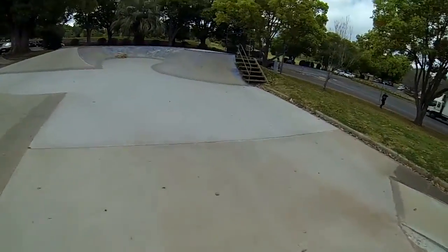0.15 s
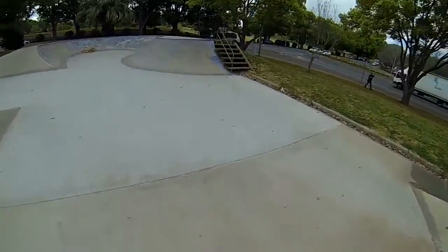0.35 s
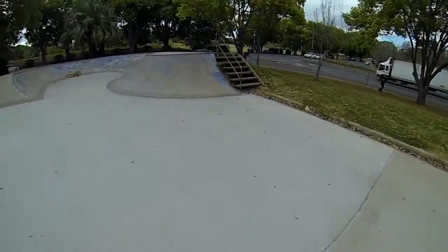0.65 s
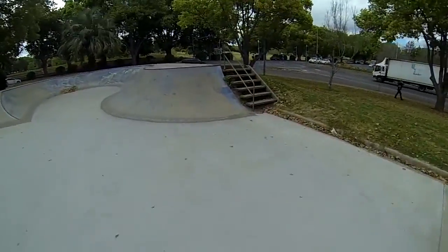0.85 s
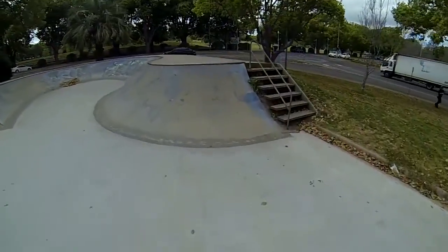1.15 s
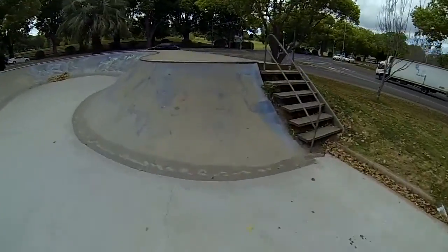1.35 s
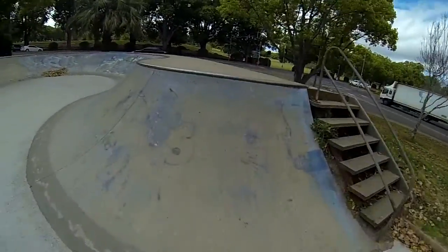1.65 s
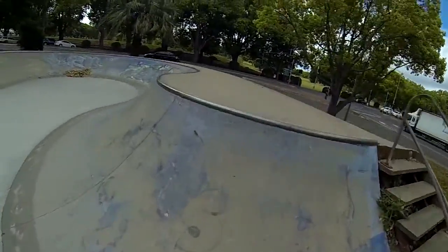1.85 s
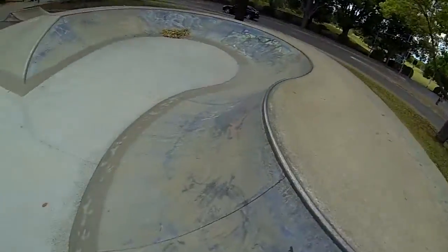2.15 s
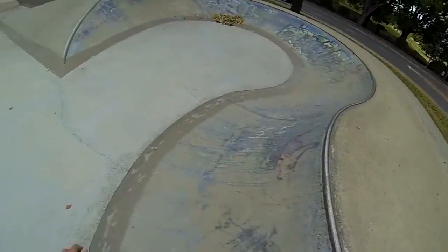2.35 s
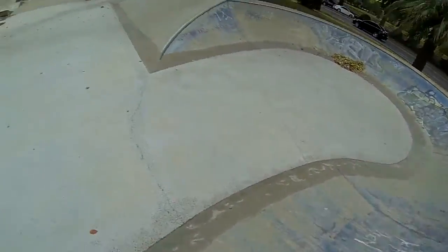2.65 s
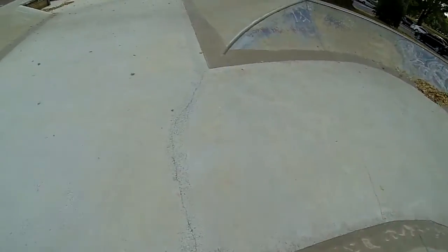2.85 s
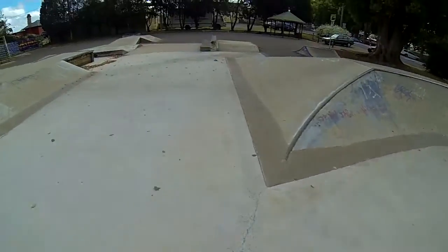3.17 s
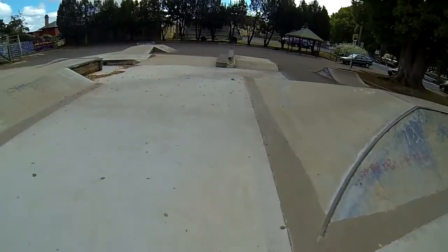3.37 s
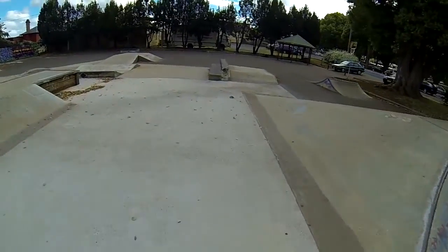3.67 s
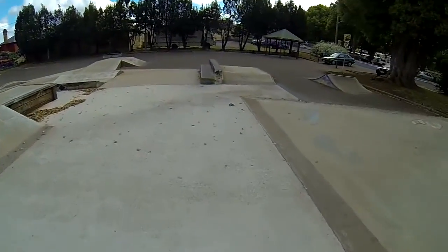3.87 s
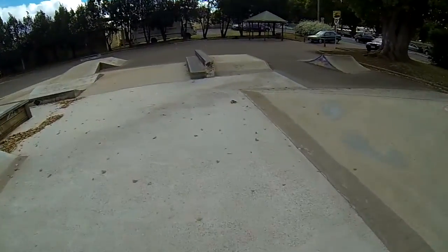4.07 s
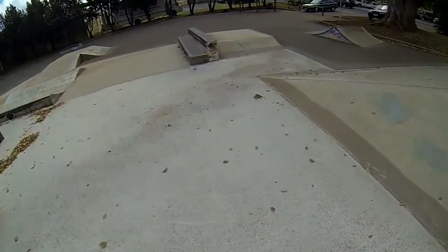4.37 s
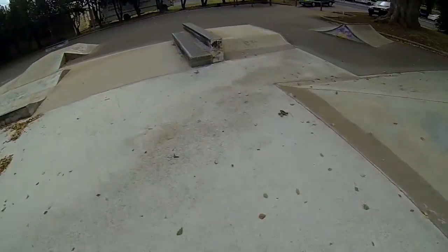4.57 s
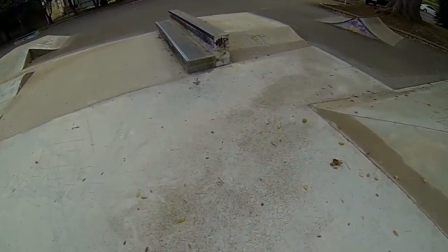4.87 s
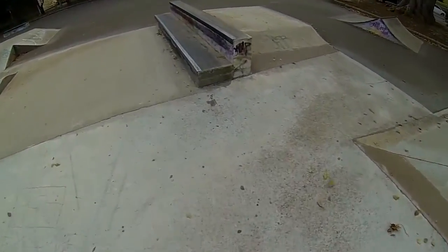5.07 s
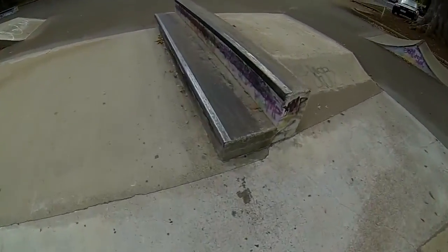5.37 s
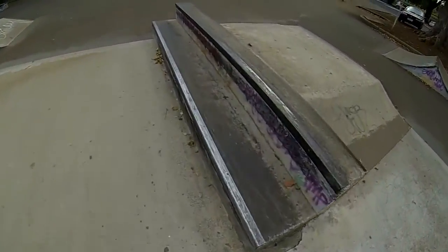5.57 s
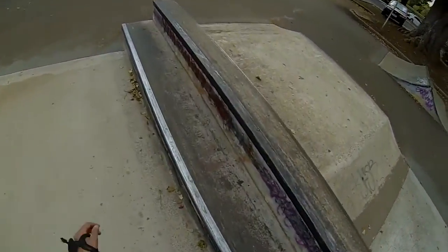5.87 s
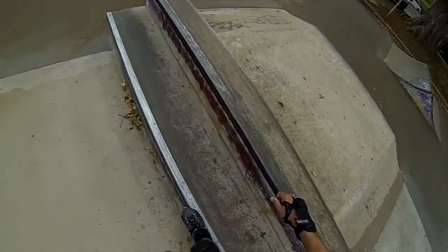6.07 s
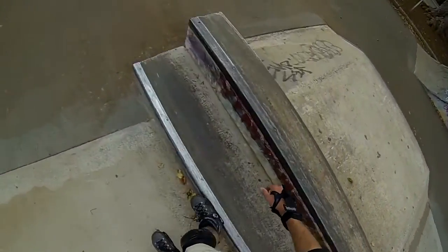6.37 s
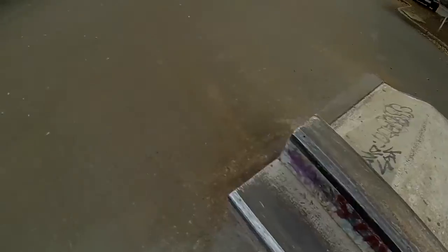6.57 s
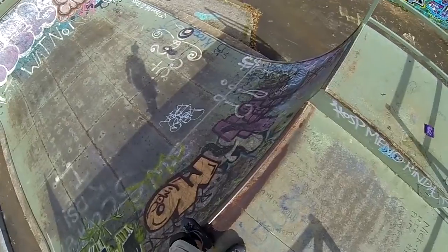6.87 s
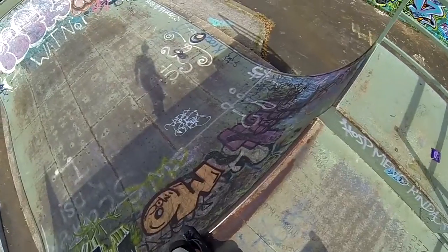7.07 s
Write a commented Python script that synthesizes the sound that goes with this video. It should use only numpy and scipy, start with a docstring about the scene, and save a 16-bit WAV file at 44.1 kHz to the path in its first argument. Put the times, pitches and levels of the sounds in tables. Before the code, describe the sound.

Close, slightly dull microphone on a moving skater in the open air. Strong low wind buffeting and popping leads, then eases so the wheels' grainy hiss and rumble show through. Loose plastic ticks cluster around a midway knock. Later come a burst of hard clatter, a short rough slide with squeaks, and a solid landing, before the sound switches suddenly to strong wind over faint rolling.

```python
"""Outdoors on concrete, a skater rolls along wearing a small camera: two shots joined by a cut.
Headwind buffets the microphone port: slow and quick noise in gusts and lulls, with single steep swings.
Wheels hiss and rumble as shaped noise, more quietly in the second shot.
Noisy shoves ring frames and boots; a slide along a ledge is slipping noise with rasps and squeaks.
Low swings thud, the loose camera mount ticks and rattles, and a thin whistle swells twice."""
import sys
import numpy as np
from scipy import signal
from scipy.fft import rfft, irfft, next_fast_len
from scipy.io import wavfile
from scipy.ndimage import uniform_filter1d, minimum_filter1d

SR = 44100
rng = np.random.default_rng(int(sys.argv[2]) if len(sys.argv) > 2 else 0)


def convert_level_to_amplitude(level_db):
    """Map a level in decibels to its linear amplitude factor."""
    exponent = np.asarray(level_db, float) / 20
    return 10 ** exponent


def inscribe(sig):
    """Save sig as 16-bit PCM at rate SR to the path in sys.argv[1].

    A 1-D sig is mono; a 2-D sig holds one channel per row.
    Samples are clipped to [-1, 1] before scaling.
    """
    pcm = np.round(np.clip(np.atleast_2d(sig).T, -1, 1) * 32767)
    wavfile.write(sys.argv[1], SR, pcm.astype(np.int16))


N = 318843  # length in samples


def noise():
    """White noise: every pitch equally strong."""
    return rng.standard_normal(N)


def unit(x):
    """Scale a sound to an rms of 1, so that a level can be set afterwards."""
    return x / np.sqrt(np.mean(x ** 2))


def colour(x, spectrum):
    """Shape the spectrum of x by (pitch_hz, level_db) points; rms 1."""
    hz, db = np.transpose(spectrum)
    size = next_fast_len(N)
    log_hz = np.log(np.fft.rfftfreq(size, 1 / SR) + 1)
    shape_db = np.interp(log_hz, np.log(hz), db)
    return unit(irfft(rfft(x, size) * convert_level_to_amplitude(shape_db), size)[:N])


def narrow(hz, width_hz):
    """Noise gathered around one resonance; rms 1."""
    return colour(noise(), [(hz + k * width_hz, -12 * k * k) for k in range(-3, 4)])


def curves(table):
    """Join timed points with straight lines, one curve per column; -120 dB outside the table."""
    s, *columns = np.transpose(table)
    return [np.interp(np.arange(N) / SR, s, column, left=-120, right=-120) for column in columns]


def walk(rate):
    """Random levels, drawn `rate` times per second and smoothed twice; rms 1."""
    k = int(SR / rate)
    steps = np.repeat(rng.standard_normal(N // k + 1), k)
    return unit(uniform_filter1d(uniform_filter1d(steps, k), k)[:N])


def wander(rate):
    """A walk less its own quarter-second average, so that it keeps coming back."""
    steps = walk(rate)
    return steps - uniform_filter1d(steps, int(.25 * SR))


def even(x, seconds):
    """Divide out the slow swings in the size of x; rms 1."""
    size = uniform_filter1d(np.abs(signal.hilbert(x, next_fast_len(N))[:N]), int(seconds * SR))
    return unit(x / size)


def peak(s, db, rise_db_s, fall_db_s):
    """A level in dB that climbs to one moment and falls away from it."""
    late = np.arange(N) / SR - s
    return db - np.where(late < 0, -rise_db_s, fall_db_s) * late


def ring(force, modes, tilt_db, contact_ms):
    """A force rings damped modes; tilt_db(hz) and chance weight them for the spot struck; peak 1."""
    t_ms = np.arange(len(force)) / SR * 1000
    hz, db, t60_ms = np.transpose(modes)[:, :, None]
    # no two strikes ring quite alike
    hz = hz * (1 + .04 * rng.standard_normal(hz.shape))
    db = db + tilt_db(hz) + 2 * rng.standard_normal(hz.shape)
    decay = 1000. ** (-t_ms / t60_ms)  # 60 dB down after t60_ms
    body = np.sum(convert_level_to_amplitude(db) * np.sin(2 * np.pi * hz * t_ms / 1000) * decay, axis=0)
    body *= (1 - np.exp(-t_ms / contact_ms)) ** 2  # the contact gives a little, which blunts the edge
    sound = signal.fftconvolve(force, body)[:len(force)]
    return sound / np.abs(sound).max()


def add(out, s, sound):
    """Mix a short sound into out from s seconds on."""
    i = int(s * SR)
    out[i:i + len(sound)] += sound[:N - i]


def wind():
    """Large eddies heave slowly, small ones flutter in bursts, a few burst on the port as steep swings."""
    # headwind before and after the cut: (start_s, buffet_db, flutter_over_buffet_db)
    headwind = [
        [(0.0, -28.5, 3), (0.12, -15, -1), (0.5, -17, 2.5), (0.7, -23, 2), (1.0, -16.5, 1), (1.4, -17.5, 0),
         (1.65, -20, 1.5), (1.85, -15.5, 0), (2.08, -24.5, -8), (2.45, -23, -6), (2.75, -26, -11.5),
         (3.2, -22, -13), (3.6, -25.5, -13.5), (4.0, -26.5, -11.5), (4.75, -25, -6), (5.25, -23, -4),
         (5.65, -25.5, -3.5), (6.1, -29, -13), (6.45, -28, -8), (6.69, -21, -5.5)],
        [(6.705, -14.5, -9.5), (6.945, -20.5, -7.5), (7.23, -11, -16.5)],
    ]
    # gusts and lulls: (centre_s, heave_change_db, flutter_change_db, length_ms)
    gusts_and_lulls = [(0.309, 2, 0, 64), (0.46, -6.5, 1.5, 51), (0.53, 9, -6, 50), (0.59, 4, 3.5, 40),
                       (0.93, 3.5, 2, 48), (1.09, -6.5, -1.5, 47), (1.29, 2, 3, 14), (1.81, -1, 4.5, 72),
                       (1.88, 4.5, 2.5, 26), (1.97, 5.5, 7, 45), (2.04, 7.5, 6.5, 25), (2.17, 8.5, -2, 18),
                       (2.56, 5, 6, 18), (3.06, 7, 15.5, 17), (3.16, 3, 2, 31), (3.68, 1, 10, 41),
                       (3.89, 2.5, 11.5, 83), (4.15, 2, 12, 39), (4.29, 8, 4.5, 40), (4.51, 6, 3.5, 65),
                       (4.69, 3.5, 5, 32), (5.032, 8, 7, 10), (5.33, 5, 6, 15), (5.46, 14.5, 4, 17),
                       (5.591, 13.5, 4, 22), (6.629, 5.5, -5, 17), (6.72, 9, -6, 9.4), (6.78, 7, 3, 20),
                       (6.888, 0, 7, 18), (7.01, 6.5, 0.5, 52), (7.129, 11.5, -8, 8.2)]
    # spectra of the slow and the quick part: (pitch_hz, relative_level_db)
    buffet_spectrum = [(7.1, -35.5), (12, 0), (38, 5), (200, -18), (260, -53.5), (440, -120)]
    flutter_spectrum = [(35, -35), (60, -5.5), (86, -0.5), (236, -10.5), (375, -17), (610, -25), (981, -31),
                        (1400, -51.5), (1820, -63), (3080, -120)]
    # eddies that burst on the port: (centre_s, level_db, swing_ms)
    pops = [(0.29, -11.5, 0.65), (0.403, -2, 1.8), (0.451, -5.5, 2.8), (1.056, -5, 3.4), (1.088, -6.5, 2.8),
            (1.154, -11.5, 0.67), (1.29, -20, 4.1), (1.577, -2.5, 1.77), (6.714, -5, 2.4), (6.8, -13, 1.5),
            (6.858, -13, 1.2), (6.992, -7.5, 2.35), (7.045, -6.5, 2.3), (7.134, -7, 2.4),
            (7.193, -20.5, 1.3)]

    t = np.arange(N) / SR
    wind_db, over_db = curves(np.vstack(headwind))
    # the wind also wanders by itself
    buffet_db = wind_db + 3 * wander(18)
    flutter_db = wind_db + over_db + 2 * wander(15)
    for s, heave_change_db, flutter_change_db, length_ms in gusts_and_lulls:
        bump = np.exp(-((t - s) * 1000 / length_ms) ** 2)
        buffet_db = buffet_db + heave_change_db * bump
        flutter_db = flutter_db + flutter_change_db * bump

    buffet = even(colour(noise(), buffet_spectrum), 0.03)
    flutter = even(convert_level_to_amplitude(2.66 * walk(60)) * colour(noise(), flutter_spectrum), 0.065)
    out = convert_level_to_amplitude(buffet_db) * buffet + convert_level_to_amplitude(flutter_db) * flutter
    for s, db, swing_ms in pops:
        u = (t - s) * 1000 / swing_ms
        # down, then up; the 3 brings the swing to about its full size
        out = out + 3 * convert_level_to_amplitude(db) * u / (1 + u * u) ** 2
    return out


def wheels():
    """Bumps in the concrete drive the wheels; grit adds uneven grains; the bearings whirr in throbs."""
    # rolling before the cut, then more quietly after it: (start_s, roll_db)
    rolling = [
        [(0.0, -36.5), (0.26, -30.5), (0.45, -38), (0.86, -33.5), (1.14, -34.5), (1.77, -34), (1.94, -38.5),
         (2.16, -40.5), (2.48, -34), (2.89, -36), (3.3, -34), (4.38, -35.5), (5.02, -33.5), (5.9, -38),
         (6.12, -37), (6.7, -36.5)],
        [(6.706, -45), (7.23, -45)],
    ]
    # spectra of wheels and grit: (pitch_hz, relative_level_db)
    wheel_spectrum = [(150, -30), (250, -0.5), (382, -6.5), (436, -6), (708, -2.5), (808, -4), (959, -2.5),
                      (1380, -8), (1950, -6), (2800, -22), (3640, -30), (6160, -120)]
    grit_spectrum = [(1290, -20.5), (2200, -9), (2550, -5.5), (3420, -5.5), (4510, -17.5), (5320, -18),
                     (5910, -24.5), (6960, -26.5), (8820, -29), (13300, -40.5), (13900, -42.5),
                     (14800, -38), (15500, -50.5)]
    # level of the grit against the roll, before and after the cut [dB]
    first_grit_db, second_grit_db = -14.5, -10.5

    roll_db, = curves(np.vstack(rolling))
    cut_s = rolling[1][0][0]
    before_cut = np.arange(N) / SR < cut_s
    grit_db = roll_db + np.where(before_cut, first_grit_db, second_grit_db)

    rough = wander(24.99)  # roughness shared by roll and grit
    roll = unit(convert_level_to_amplitude(0.69 * rough) * colour(noise(), wheel_spectrum))
    # one sample in fifty may stand out as a grain
    grains = noise() * convert_level_to_amplitude(2.1 * rng.exponential(size=N) * (rng.random(N) < .02))
    grit = unit(convert_level_to_amplitude(0.43 * rough + 1.1 * wander(70)) * colour(grains, grit_spectrum))
    whirr = unit(convert_level_to_amplitude(4.1 * wander(30)) * narrow(5250, 600))
    whirr_db = peak(3.22, -58.5, rise_db_s=12.5, fall_db_s=20)
    return convert_level_to_amplitude(roll_db) * roll + convert_level_to_amplitude(grit_db) * grit + convert_level_to_amplitude(whirr_db) * whirr


def knocks():
    """Each blow is a short gritty shove into frame and boot that swells and lets go."""
    # blows: (start_s, peak_db, hardness_db per octave above the pivot,
    # weight_db per octave below the pivot, time_to_height_of_shove_ms)
    blows = [(0.114, -12, 4, -12, 1.02), (2.636, -6, -26, 7, 2.5), (2.6425, -11.5, 6.5, 0, 2.4),
             (2.6485, -2, -2.5, 3.5, 1.17), (2.6511, -3.5, -0.5, 6.5, 1.3), (3.0245, -12.5, -14, -4, 3.34),
             (3.06, -20, 6.5, -9.5, 2.7), (3.0696, -17, -1, 3, 1.84), (4.05, -18, -4, -13, 1.05),
             (4.5655, -13.5, 0.5, -20, 1.5), (4.582, -21, -10, -16, 1.5), (5.9341, -25, 1, 14, 1.2),
             (5.948, -9.5, 9.5, -19, 0.84), (5.95, -7.5, -7.5, -28, 2.35), (5.965, -7, 7, -13, 1.6),
             (5.9625, -14, 2, -14, 1.5), (5.969, 0, 4.5, -19, 0.81), (5.9711, -3.5, 1.5, -14, 1.1),
             (5.9749, -9, 4, -19, 1.7), (5.9785, -9.5, 2, -14, 1), (5.9822, -6, 4, -14, 1.57),
             (5.9874, -12, 1, -15, 1.7), (5.997, -15, 4, -13, 1.03), (6.004, -14.5, 10, -8, 3.3),
             (6.0144, -22, 11, -14, 3.3), (6.2115, -23, 1, -15, 2.3), (6.228, -19, -1, -20, 1.38),
             (6.3375, -23, 4, 7, 4.3), (6.421, -19.5, 2.5, -9, 3.5), (6.4532, -8, -10, -17, 2.6),
             (6.462, -3.5, 5.5, 7, 0.88), (6.4644, -3, -1, -3, 1.2), (6.4671, -9, 7, 9, 1.52),
             (6.5103, -12, -4.5, -4, 3.7), (6.524, -5.5, 6.5, 10, 0.59)]
    # resonances of frame and boot: (pitch_hz, relative_level_db, t60_ms)
    frame = [(135, -0.5, 18), (211, -11, 16), (334, -15, 39), (442, 10, 16.4), (508, 9, 15), (600, 9.5, 16),
             (763, 14.5, 14.6), (870, -9.5, 11), (995, 12, 15), (1260, 14, 5.6), (1613, 1, 24),
             (1760, 10.5, 7.9), (2200, -2, 24), (2680, -6, 9.3), (2760, -7, 17), (3580, -10, 9.9),
             (3340, -29, 9.8), (4380, -16, 3.1), (5040, -24, 5.3), (6480, -24, 3.5), (8050, -28, 1.5),
             (10050, -31, 1.8), (12100, -38, 1.9)]
    pivot_hz = 750

    out, t_ms = np.zeros(N), np.arange(SR // 12) / SR * 1000
    for s, db, hard_db, heavy_db, shove_ms in blows:
        push = t_ms / shove_ms
        shove = rng.standard_normal(len(push)) * push * np.exp(-push)
        shove[int(shove_ms * SR / 1000)] += 2.5  # the hardest contact comes at the height of the shove

        def tilt_db(hz):
            """A hard blow lifts the high modes, a heavy one the low modes."""
            return np.where(hz > pivot_hz, hard_db, -heavy_db) * np.log2(hz / pivot_hz)

        contact_ms = 0.19 * 2 ** (-max(hard_db, -8) / 8)  # hard blows touch more briefly
        add(out, s, convert_level_to_amplitude(db) * ring(shove, frame, tilt_db, contact_ms))
    return out


def scratch_noise():
    """Grit under pressure: noise in which one sample in twenty may stand out."""
    return noise() * convert_level_to_amplitude(3.5 * np.minimum(rng.exponential(size=N), 5) * (rng.random(N) < .05))


def slide(scratches):
    """Hard plastic drags along the ledge in uneven slips; each resonance catches on its own; grit rasps."""
    # pressure of the slide: (start_s, level_db)
    pressure = [(6.0, -63), (6.05, -55), (6.1, -56), (6.16, -51), (6.2, -53), (6.23, -48), (6.245, -49),
                (6.265, -45), (6.3, -52.5), (6.33, -47), (6.355, -53), (6.38, -58), (6.425, -56),
                (6.46, -59), (6.5, -69), (6.56, -59)]
    # ledge resonances: (pitch_hz, width_hz, relative_level_db)
    ledge = [(910, 200, -3.5), (2200, 460, 2.5), (3900, 350, -4.5), (5200, 600, -0.5), (6450, 500, -8.5),
             (7600, 700, -27), (8800, 800, -17.5), (10700, 1100, -30)]
    # spectrum of the rasp: (pitch_hz, relative_level_db)
    rasp_spectrum = [(1500, -10.5), (3000, 12.5), (5500, -0.5), (8000, -13.5), (11000, -17), (14000, -23),
                     (15500, -35.5)]

    slips_db = walk(40) + 3.4 * walk(280)
    drag = np.zeros(N)
    for hz, width_hz, db in ledge:
        catch_db = 3.0 * walk(60)
        drag += convert_level_to_amplitude(db + slips_db + catch_db) * narrow(hz, width_hz)
    rasp = unit(convert_level_to_amplitude(slips_db) * colour(scratches, rasp_spectrum))
    pressure_db, = curves(pressure)
    return convert_level_to_amplitude(pressure_db) * (unit(drag) + convert_level_to_amplitude(3.5) * rasp)  # rasp 3.5 dB over the drag


def crunches(scratches):
    """Grit crunches under a blow: scratchy noise that leaps up and dies away."""
    # crunches: (loudest_s, level_db, rise_db_per_s, fall_db_per_s)
    bursts = [(2.645, -46, 2500, 2000), (2.652, -35, 3000, 6000), (3.03, -47, 2500, 1200),
              (5.951, -29, 9000, 2500), (5.9517, -29, 4000, 1200), (5.966, -26, 9000, 2500),
              (5.9705, -22.5, 3000, 900), (5.982, -37, 2500, 1200), (5.994, -43, 4000, 1500),
              (6.0055, -47, 6000, 600), (6.464, -38.5, 5000, 1200), (6.497, -53, 5000, 1500),
              (6.514, -47, 5000, 1000)]
    # spectrum of the crunch: (pitch_hz, relative_level_db)
    crunch_spectrum = [(1500, -7), (3000, 2.5), (5300, -5.5), (7000, -17.5), (10000, -25), (14000, -28),
                       (15500, -39)]
    return sum(convert_level_to_amplitude(peak(*burst)) for burst in bursts) * colour(scratches, crunch_spectrum)


def squeaks():
    """Short pure tones that swell and fade as the slide squeaks."""
    # squeaks: (centre_s, peak_db, pitch_hz, length_ms)
    tones = [(6.215, -48, 3900, 6), (6.252, -41, 3850, 5.5), (6.266, -40, 3900, 5.2),
             (6.322, -39, 3870, 6.1), (6.338, -29, 2200, 9.4), (6.375, -48, 5200, 4),
             (6.406, -44, 4070, 4.9)]
    out, u = np.zeros(N), np.arange(SR // 20) / SR - .025  # seconds from the middle of the squeak
    for s, db, hz, length_ms in tones:
        swell = np.exp(-(u * 2000 / length_ms) ** 2)
        add(out, s - .025, convert_level_to_amplitude(db) * np.sin(2 * np.pi * hz * u) * swell)
    return out


def thuds():
    """The skater's weight comes down: a dull low swing through the legs dies in a few cycles."""
    # thuds: (start_s, level_db before decay, pitch_hz, t60_ms)
    landings = [(2.648, -20, 150, 44), (3.056, -27, 130, 49), (6.461, -3.5, 149, 57), (6.521, -6, 144, 25)]
    out, t = np.zeros(N), np.arange(SR // 8) / SR
    for s, db, hz, t60_ms in landings:
        add(out, s, convert_level_to_amplitude(db) * np.sin(2 * np.pi * hz * t) * 1000. ** (-t * 1000 / t60_ms))
    return out


def ticks():
    """The mount taps the housing, then chatters in small dying rebounds; faint ticks come at random."""
    # ticks: (start_s, peak_db, sharpness_db per octave, rattle_ms)
    taps = [(0.1498, -40.5, 10, 3), (0.154, -23, -11, 6.1), (0.261, -44, 12, 5.5), (0.278, -20.5, -22, 5.6),
            (0.342, -13.5, -9.5, 10.6), (0.356, -44, 14.5, 2), (0.385, -38, -8, 2), (0.6065, -39, 2, 2),
            (0.823, -27, -9.5, 2.7), (1.1534, -23.5, -11, 2.2), (2.137, -28, -19, 3), (2.194, -37, -12, 2),
            (2.2455, -28, -11, 3.7), (2.266, -19.5, 10.5, 3.7), (2.277, -33, -10, 2),
            (2.3494, -11, -8.5, 7.3), (2.3995, -34, -12, 2), (2.446, -23, 1.5, 1.4), (2.552, -32, -1, 2),
            (2.6913, -7, -6, 3.3), (2.695, -24, 6, 2), (2.696, -23.5, 4, 2), (2.6987, -13.5, -8, 4),
            (2.777, -29, -16, 3), (2.8426, -7.5, -7.5, 13), (2.8471, -11.5, -7, 10), (2.946, -7, -8, 5.1),
            (2.9508, -8, -7, 10), (3.07, -28, 5.5, 4), (3.324, -33, -11, 3), (3.4544, -35, 9, 4),
            (3.5815, -22.5, -22, 4), (3.752, -21.5, -20.5, 4.5), (4.836, -18, -12, 5.5),
            (5.1466, -17.5, -29, 2.4), (5.4335, -34, -4, 3), (5.572, -32, -9, 4), (5.6054, -38.5, 9, 3),
            (5.664, -35, 4, 3), (5.83, -45, 10, 2), (5.872, -37.5, -2, 4), (5.9378, -25, -12, 3.4),
            (5.994, -34, 0, 4), (6.0552, -7, -4, 3.8), (6.0605, -24, -1, 2), (6.0635, -21, -6, 3),
            (6.087, -23, -18, 4), (6.172, -44, 8, 4), (6.187, -43, 13, 1.8), (6.293, -44, 10, 4),
            (6.363, -43, 8, 2), (6.443, -44, 10, 3.3), (6.4769, -10.5, -4, 2), (6.4766, -12, 8.5, 2),
            (6.4792, -12, 1.5, 2), (6.4815, -19, -7, 2), (6.4832, -13, -15, 4), (6.4963, -25, -8, 2.6),
            (6.521, -10.5, -5, 2), (6.523, -16, 7, 2), (6.524, -13, -4.5, 2), (6.528, -16.5, -2.5, 1.8),
            (6.5305, -14, -10, 3.1)]
    # resonances of the camera housing: (pitch_hz, relative_level_db, t60_ms)
    housing = [(1550, -19, 3.8), (2430, 1.5, 1.77), (3380, 7.5, 2.03), (4640, 5.5, 1.68), (5810, -0.5, 4.2),
               (6550, -8, 2.1), (9840, -6.5, 3.4), (10400, -24, 2.5), (12800, -17, 2)]

    out, t_ms = np.zeros(N), np.arange(SR // 20) / SR * 1000
    faint = []
    for when, luck in rng.random((22, 2)):
        faint_db = -43 - 3 * np.log(1 - luck)  # -43 dB or louder, mostly close to it
        faint.append((when * (N / SR - .1), faint_db, 5.5, 4.0))

    for s, db, sharp_db, rattle_ms in np.vstack([taps, faint]):
        chance = rng.random(len(t_ms))
        rebounds = rng.standard_normal(len(t_ms)) * np.where(chance < .03, 1.7, .45)  # a few are big
        rebounds = uniform_filter1d(rebounds, size=3)  # slower contacts, duller than the tap
        force = convert_level_to_amplitude(-21.5) * rebounds * np.exp(-(t_ms / rattle_ms) ** 3)  # it settles all at once
        force[0] = -1  # the tap itself

        def tilt_db(hz):
            """A sharp tap favours the high modes."""
            return sharp_db * np.log2(hz)

        contact_ms = 0.052 * 2 ** (-max(sharp_db, -16) / 16)  # sharp taps touch more briefly
        add(out, s, convert_level_to_amplitude(db) * ring(force, housing, tilt_db, contact_ms))
    return out


def whistle():
    """A thin rough whistle high in the treble: narrow noise in two short fluttering swells."""
    # swells: (loudest_s, level_db before flutter, rise_db_per_s, fall_db_per_s, stop_s)
    swells = [(3.8, -56, 200, 150, 3.92), (4.36, -71, 300, 30, 4.585)]
    flutter, t = convert_level_to_amplitude(3.7 * walk(45)), np.arange(N) / SR
    loudness = sum(convert_level_to_amplitude(peak(*swell)) * (t < stop_s) for *swell, stop_s in swells)
    return flutter * narrow(14300, 300) * loudness


def scene():
    """All the sources together, as one channel."""
    scratches = scratch_noise()  # the same grit rasps and crunches
    ledge_sounds = slide(scratches) + crunches(scratches) + squeaks()
    return (wind() + wheels() + knocks() + ledge_sounds + thuds() + ticks() + whistle())[None]


def roll_off(x):
    """The treble ends steeply here."""
    return signal.sosfilt(signal.butter(12, 15820, fs=SR, output="sos"), x)


def record(dry):
    """The housed microphone loses the top treble; a quick limiter pulls down swings near full scale."""
    dull = signal.sosfilt(signal.butter(6, 14800, fs=SR, output="sos"), dry)
    hold = SR // 100  # 10 ms
    room = np.minimum(1, .93 / (np.abs(dull) + 1e-9))  # gain that keeps each sample within .93
    gain = uniform_filter1d(minimum_filter1d(room, hold), hold)
    return roll_off(dull * gain)


dry = scene()
out = record(dry)
inscribe(out)
```